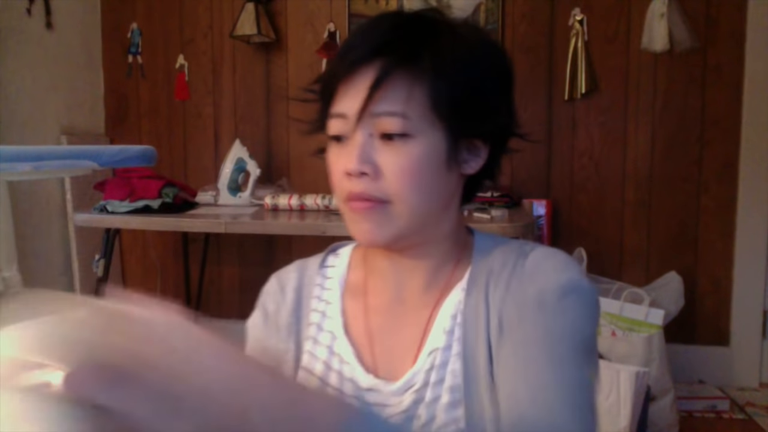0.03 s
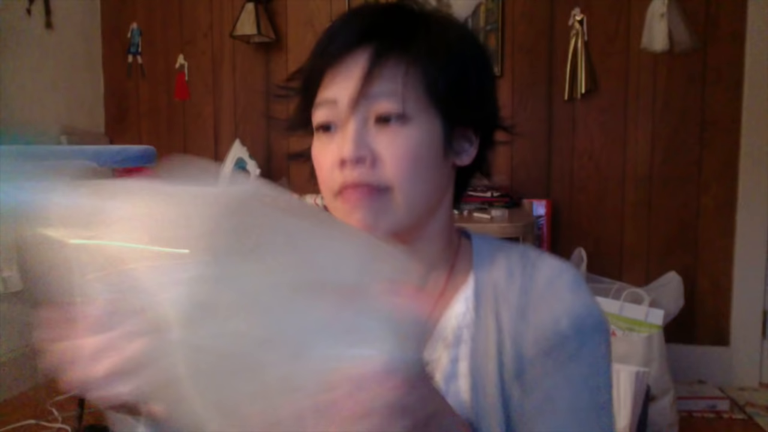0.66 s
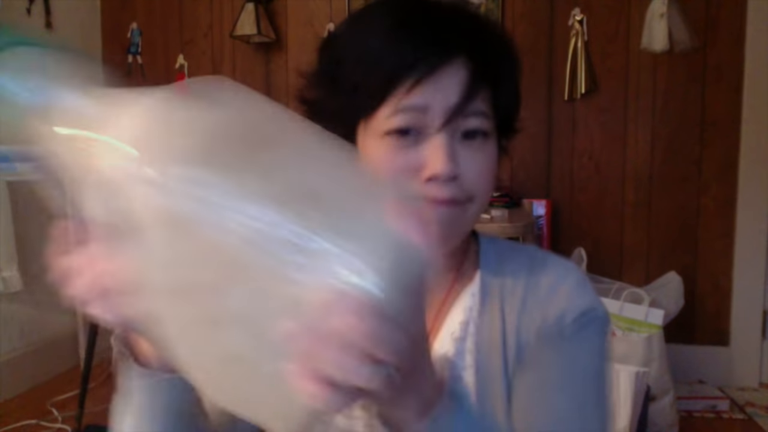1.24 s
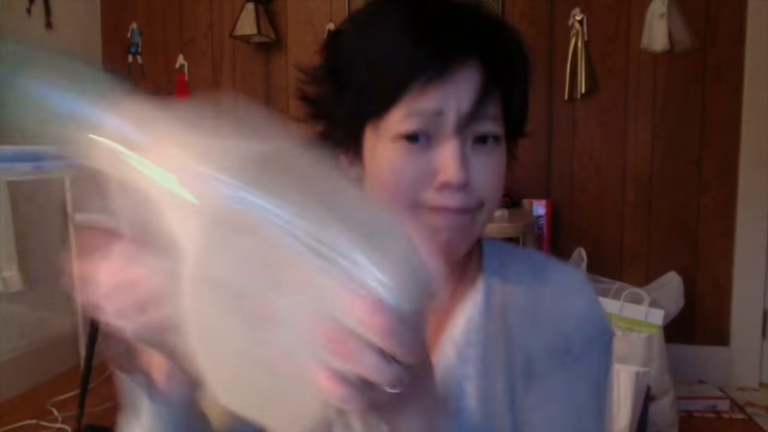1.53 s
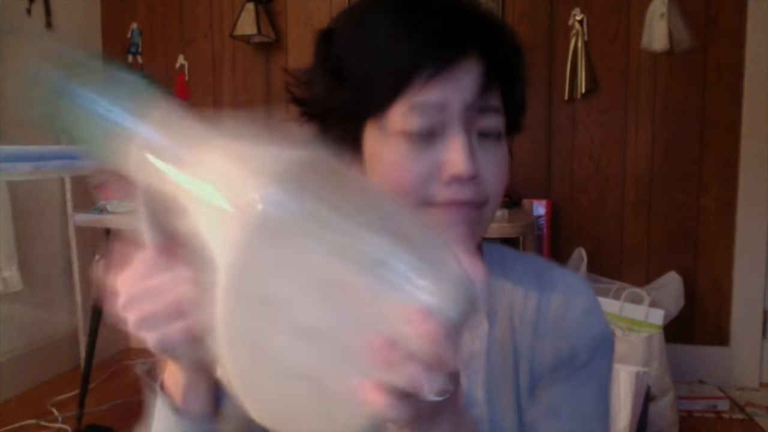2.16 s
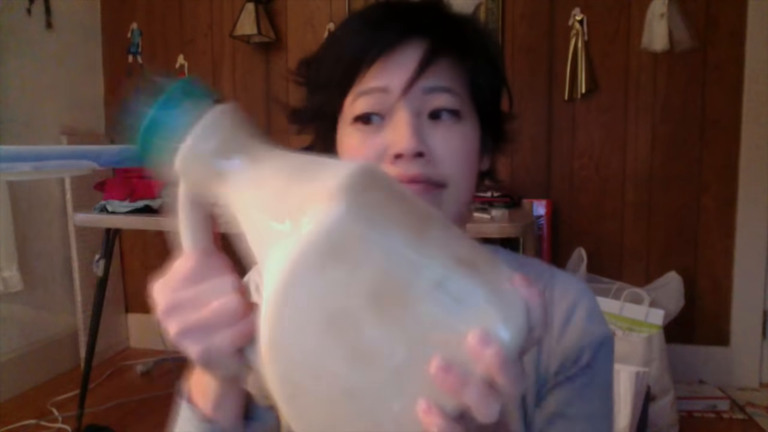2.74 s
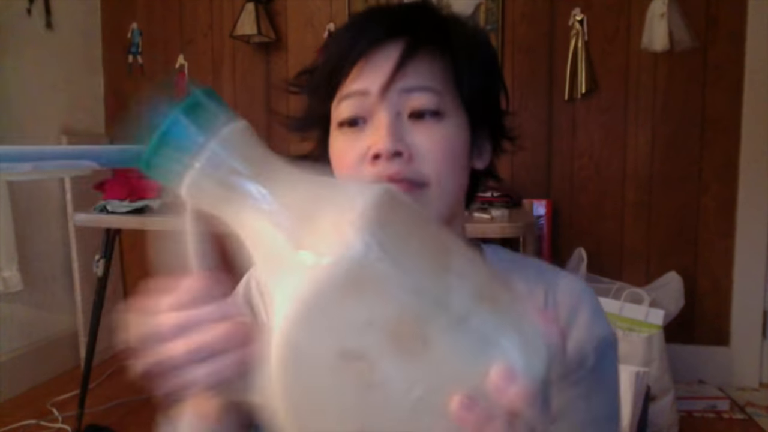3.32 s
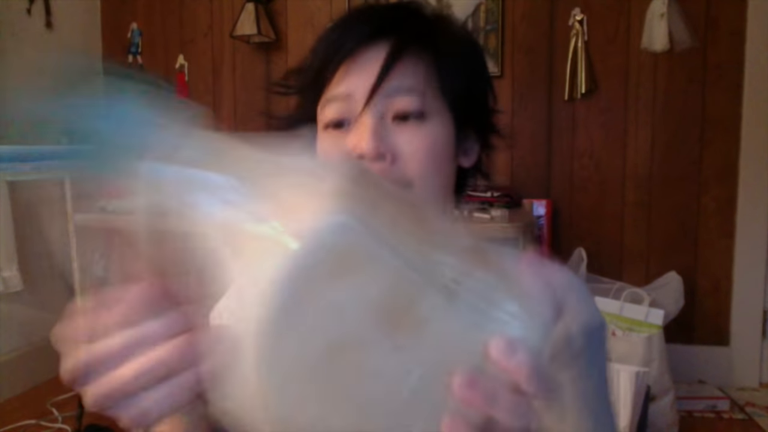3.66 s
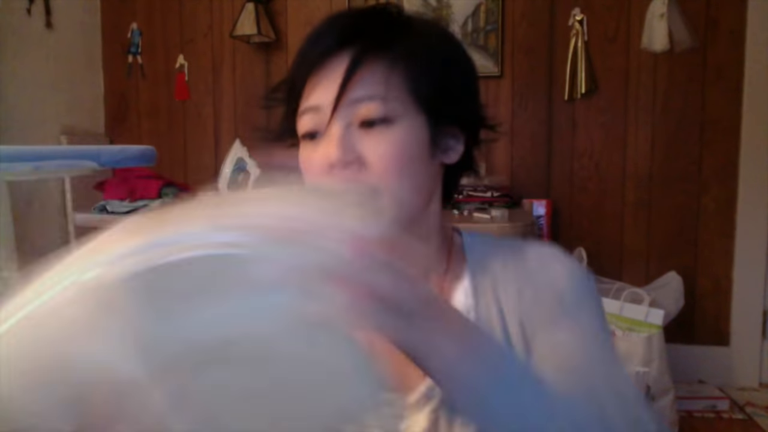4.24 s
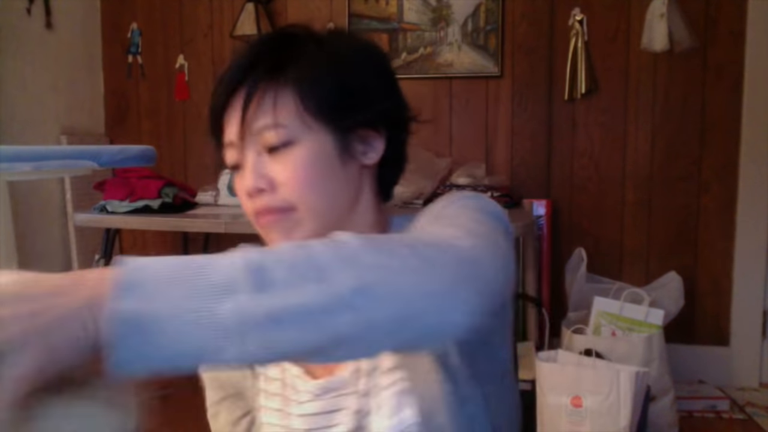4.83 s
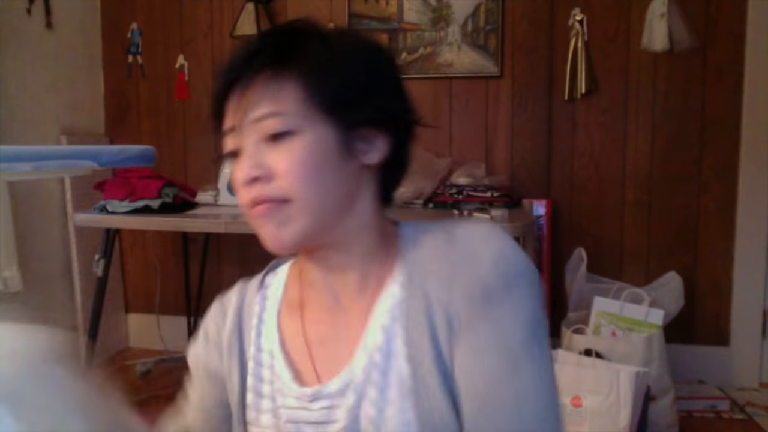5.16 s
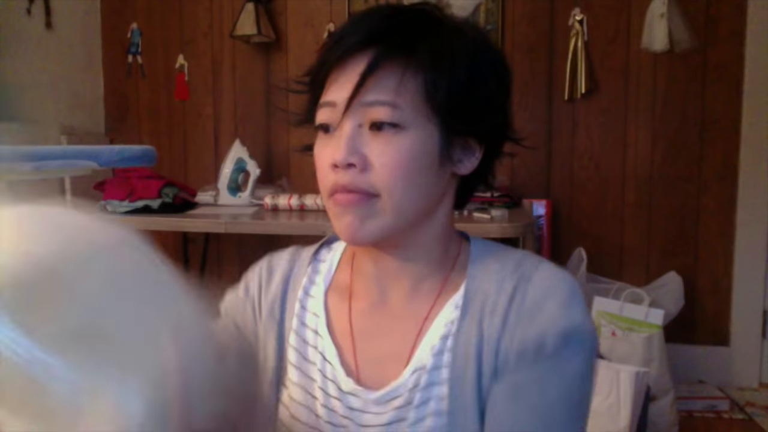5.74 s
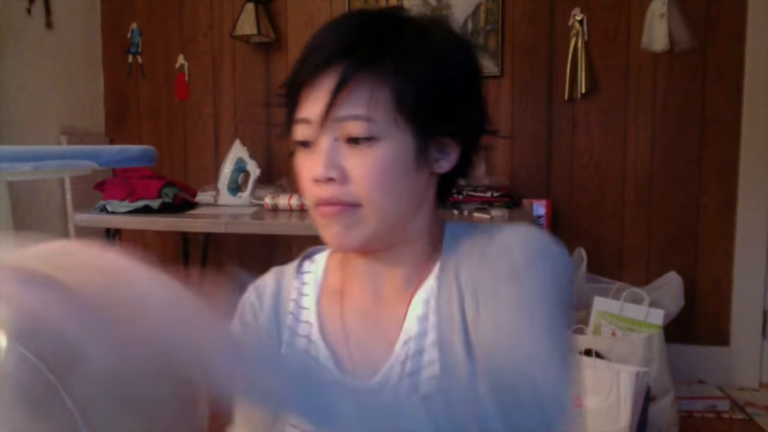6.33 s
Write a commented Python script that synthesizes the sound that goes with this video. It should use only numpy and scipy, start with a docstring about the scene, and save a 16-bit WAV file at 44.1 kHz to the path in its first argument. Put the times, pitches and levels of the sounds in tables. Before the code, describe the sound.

In a small room, liquid sloshes rapidly back and forth inside a big plastic jug right by the microphone. Each stroke thumps hollowly and breaks into bubbly splashes, with occasional glugs and dull slaps against the plastic. After building for about four seconds, the shaking eases off and the liquid trickles and settles. A single brief shake and a few small sloshes finish it.

```python
"""Water and powder are shaken hard in a big plastic jug, close to the microphone in a small room.
Seven strokes a second boom in the jug and break into gurgle, splash and spray, while bubbles pop,
slugs of water slap the plastic and air pockets glug. The shaking is hardest between 3 and 4 s.
Then the jug is lowered and the foam settles; one short shake follows at 5.8 s."""
import sys
import numpy as np
from scipy import signal
from scipy.io import wavfile
from scipy.ndimage import uniform_filter1d

SR = 44100
rng = np.random.default_rng(int(sys.argv[2]) if len(sys.argv) > 2 else 0)


def unload_audio(sound):
    """Save the sound as a 16-bit wav file, at the path given as the first command line argument."""
    columns = np.transpose(np.atleast_2d(sound))
    # keep every value between -1 and 1, then stretch to whole-number steps
    steps = np.round(np.clip(columns, -1, 1) * 32767)
    wavfile.write(sys.argv[1], SR, steps.astype(np.int16))


N = 281737
TIME = np.arange(N) / SR

# Strokes: the water hits one end of the jug, then folds back on itself as a second wave.
# t/s, swell/s, decay/s, boom/dB, gurgle/dB, splash/dB, spray/dB, fold delay/s, fold against hit/dB
STROKES = [(0, 0.00073, 0.017, -33, -44, -46, -47, 0.13, -5.5),
           (0.148, 0.057, 0.022, -35, -36.5, -32, -33, 0.031, -18),
           (0.304, 0.034, 0.032, -28, -29, -27.5, -37, 0.063, -15),
           (0.421, 0.042, 0.038, -32.0, -32.5, -31.5, -43, 0.071, 5),
           (0.58, 0.035, 0.031, -26.5, -28, -28.5, -38.5, 0.059, -3),
           (0.703, 0.046, 0.032, -26.5, -25, -23.5, -31.5, 0.077, -6.5),
           (0.872, 0.0026, 0.082, -25.5, -30, -25.5, -37, 0.14, -12),
           (0.978, 0.063, 0.025, -28, -28.5, -26.5, -34.5, 0.078, -0.5),
           (1.127, 0.037, 0.032, -23, -29.5, -27, -40, 0.075, -2.5),
           (1.275, 0.018, 0.047, -31.5, -31, -30.5, -38, 0.047, 5),
           (1.443, 0.012, 0.023, -22.5, -27.5, -27, -43, 0.056, -3.5),
           (1.569, 0.024, 0.035, -26, -28.5, -26.5, -34.5, 0.037, -0.5),
           (1.727, 0.0098, 0.035, -23.5, -27, -26.0, -51, 0.064, -1),
           (1.854, 0.033, 0.035, -23.5, -28.5, -27.5, -35.5, 0.041, 2),
           (2.001, 0.035, 0.029, -25, -25.5, -27, -38, 0.064, 1),
           (2.124, 0.055, 0.023, -23.5, -26, -26, -36, 0.082, -0.5),
           (2.281, 0.051, 0.021, -23.5, -25.5, -24.5, -42, 0.083, -2),
           (2.433, 0.035, 0.023, -22, -28.0, -27.5, -37.5, 0.058, 1.5),
           (2.594, 0.0087, 0.038, -25.5, -26.5, -26, -37.5, 0.035, -1.5),
           (2.73, 0.012, 0.032, -28, -26.5, -28, -38, 0.042, 2),
           (2.881, 0.0057, 0.034, -20.5, -25.5, -21.5, -34.5, 0.031, -6),
           (3.004, 0.03, 0.041, -30, -28, -26.5, -37, 0.049, -2),
           (3.148, 0.024, 0.034, -18.5, -24.5, -22.5, -38, 0.047, -1),
           (3.273, 0.037, 0.025, -25.5, -23, -27.5, -36, 0.06, 3.5),
           (3.438, 0.0039, 0.031, -21, -24, -22, -31, 0.057, -6.5),
           (3.583, 0.007, 0.042, -25.5, -31, -27, -38, 0.038, 5),
           (3.72, 0.013, 0.04, -17, -24, -18, -27, 0.054, -9.5),
           (3.864, 0.025, 0.033, -24.5, -23.5, -22, -31, 0.06, -5),
           (3.966, 0.067, 0.014, -36.5, -33.5, -30.5, -41, 0.037, 8),
           (4.083, 0.0066, 0.006, -27.5, -34, -25, -47, 0.056, -12),
           (4.147, 0.018, 0.018, -27, -26, -32, -49, 0.08, -25),
           (4.269, 0.015, 0.028, -35, -31, -37, -36.5, 0.053, -1),
           (4.356, 0.024, 0.029, -32.5, -36.0, -33, -32.5, 0.023, 3),
           (4.491, 0.005, 0.033, -22, -23, -24.5, -35.5, 0.086, -6.5),
           (4.603, 0.012, 0.019, -30.5, -43, -22.5, -21, 0.054, -18),
           (4.664, 0.051, 0.071, -37, -35.5, -31.5, -38, 0.14, -3.5),
           (4.8, 0.031, 0.035, -35.5, -31.5, -34, -39, 0.11, -11),
           (4.904, 0.031, 0.05, -34, -39, -36, -48, 0.036, -1),
           (5.064, 0.014, 0.022, -42.0, -42.5, -33.5, -43.5, 0.055, -1.5),
           (5.288, 0.0052, 0.011, -43.5, -50, -28.5, -45, 0.073, -14),
           (5.441, 0.0063, 0.06, -52, -50, -44.5, -64, 0.065, -9),
           (5.815, 0.019, 0.08, -29.5, -34, -35, -44.5, 0.051, 1),
           (6.025, 0.0028, 0.018, -46, -33.5, -37, -69, 0.038, -18),
           (6.172, 0.012, 0.018, -43.5, -38.5, -61, -82, 0.062, 1.5),
           (6.277, 0.026, 0.033, -46.5, -54, -39, -39.5, 0.063, 2.5),
           (6.344, 0.017, 0.01, -32.5, -26, -28, -40.5, 0.011, -13)]


def slosh():
    """Strokes boom in the jug and tear the water into bubbles; returns boom, foam, splash envelope."""
    # Colours of large, middling and tiny bubbles, and of mist and powder on the plastic: f/Hz, level/dB
    gurgle_eq = [(300, -8), (450, -7.5), (515, 0), (630, 2), (850, -3), (1150, -5), (1500, -24)]
    splash_eq = [(900, -10.5), (1250, -2.5), (1600, 2), (2200, -1.5), (3000, -2.5), (4300, -6), (5400, -23)]
    spray_eq = [(3600, -24.5), (4600, 3), (5100, 2.5), (6000, -1.5), (7700, -10), (10000, -21.5),
                (12500, -30.5), (15500, -58)]
    mist_eq = [(2000, -15), (5000, -9), (8000, 8.5), (11000, -7.5), (13000, -15.5), (15500, -21)]
    boom_db, gurgle_db, splash_db, spray_db = np.transpose(STROKES)[3:7]
    boom = steadied(jug(rng.standard_normal(N)), span_s=0.0335, amount=0.96)
    boom *= flow(boom_db, swell_scale=1.16, decay_scale=1.4, fold_db=-3, trickle_db=-33)
    gurgle = froth(gurgle_eq, 396.4, 1406, per_s=900, spread_db=5.5, cycles=2.08, even=1, clump_db=3)
    gurgle *= flow(gurgle_db, swell_scale=0.98, decay_scale=0.93, fold_db=-3, trickle_db=-17.5)
    splash = froth(splash_eq, 967, 5050, per_s=4000, spread_db=3.5, cycles=2.9, even=1, clump_db=1)
    splash_env = flow(splash_db, swell_scale=1, decay_scale=1, fold_db=1, trickle_db=-13)
    spray = froth(spray_eq, 3980, 13600, per_s=3000, spread_db=5, cycles=15.3, even=0.39, clump_db=1)
    spray_env = flow(spray_db, swell_scale=1.22, decay_scale=0.68, fold_db=3.6, trickle_db=-20.5)
    mist = froth(mist_eq, 5000, 15000, per_s=3000, spread_db=5, cycles=12, even=.4, clump_db=2, bands=80)
    mist *= amp(-35) * np.tanh((spray_env / amp(-29.5)) ** 2.8)  # only the hardest sloshing makes mist
    foam = amp(1) * gurgle + amp(0.3) * splash * splash_env + amp(-0.5) * (spray * spray_env + mist)
    return amp(0.5) * boom, foam, splash_env


def flow(levels_db, swell_scale, decay_scale, fold_db, trickle_db):
    """Envelope of one layer: the hit and fold-back of every stroke, riding on the trickle."""
    # Liquid draining down the walls between strokes: t/s, level/dB
    trickle = [(0, -24), (.1, -54.5), (.25, -28), (1, -32), (2, -34.5), (4, -32), (5, -29.5), (5.2, -37),
               (5.65, -46), (6.15, -48), (6.39, -41)]
    power = amp(np.interp(TIME, *np.transpose(trickle)) + trickle_db) ** 2
    for (start, swell_s, decay_s, *_, delay_s, second_db), db in zip(STROKES, levels_db):
        hit = amp(db) * wave(swell_s * swell_scale, decay_s * decay_scale)
        fold = amp(db + second_db + fold_db) * wave(swell_s=0.0075, decay_s=decay_s * decay_scale)
        add(power, start, hit ** 2)
        add(power, start + delay_s, fold ** 2)
    return np.sqrt(power)


def wave(swell_s, decay_s):
    """Envelope of one wave: it swells, breaks and drains away."""
    t, swell_s = TIME[:SR // 2], max(swell_s, .001)
    return np.minimum(t / swell_s, 1) ** 1.37 * np.exp(-np.maximum(t - swell_s, 0) / decay_s)


def jug(drive):
    """The walls and the air inside ring at their resonances: a hollow boom."""
    # Resonances of the jug: f/Hz, width/Hz, level/dB
    modes = [(103.5, 59, -16), (150, 55, -10), (161, 17, -6.5), (214.8, 16.2, -1.5), (245.6, 9.2, -0.5),
             (272.4, 32.6, -6.5), (325.8, 45.2, -2.5), (390.3, 51, -8.5)]
    # Colour of the boom: f/Hz, level/dB
    boom_eq = [(30, -57), (60, -5), (95, 0), (390, -5), (460, 10), (700, -41.5), (2000, -75)]
    t = TIME[:SR // 4]
    ring = sum((-1) ** k * amp(db) * width * np.exp(-np.pi * width * t) * np.cos(2 * np.pi * hz * t)
               for k, (hz, width, db) in enumerate(modes))
    return colour(signal.oaconvolve(drive, ring * 2 * np.pi / SR)[:N], boom_eq)


def froth(eq, low_hz, high_hz, per_s, spread_db, cycles, even, clump_db, bands=160):
    """A swarm of short bubbles that surges in clumps; a few stand well above the rest."""
    out = np.zeros(N + SR)
    drift = uniform_filter1d(uniform_filter1d(rng.standard_normal(N), 200), 150)
    clumps = amp(clump_db * unit(drift))
    for hz in np.geomspace(low_hz, high_hz, bands):
        when, rarity, polarity = rng.random((int(per_s * N / SR / bands), 3)).T
        births = (when * N).astype(int)
        height = np.sign(polarity - .5) * amp(spread_db * np.minimum(-np.log(rarity), 4)) * clumps[births]
        ring = damped_ring(hz, cycles * 2 ** rng.uniform(-1.08, 1), glide=0.13, onset=0.49)
        ring *= np.sqrt(hz / np.sum(ring ** 2))
        samples = births[:, None] + np.arange(len(ring))
        out += np.bincount(samples.ravel(), np.outer(height, ring).ravel(), len(out))
    return steadied(colour(out[:N], eq), span_s=0.023, amount=even)


def pops(splash_env):
    """Loud single bubbles, and lesser ones at random whose strength follows the splash."""
    # The loudest bubbles: t/s, level/dB, f/Hz, ring time/s
    loud_pops = [(.236, -22.5, 1700, 0.002), (.2868, -16, 2220, .0012), (.3597, -14.5, 2190, .0008),
                 (.5932, -12, 1920, .0008), (.886, -9, 1930, 0.0016), (.899, -12, 2230, 0.0016),
                 (1.1606, -12, 1710, .0015), (1.447, -8, 1990, 0.00081), (1.4608, -13.5, 2250, 0.0025),
                 (1.616, -11, 1480, 0.0026), (1.701, -18, 2260, 0.0013), (1.7371, -19, 2130, .0019),
                 (1.8105, -13.5, 2670, 0.0013), (2.0255, -6.5, 2360, 0.00078), (2.0369, -13, 2310, 0.0013),
                 (2.217, -11.5, 1650, 0.0015), (2.2904, -16, 2430, 0.0015), (2.3058, -11, 2350, .0025),
                 (2.6064, -13.5, 2110, .002), (2.618, -12, 2800, .0011), (2.8121, -10, 1560, .0025),
                 (2.874, -18, 2540, 0.0026), (3.1445, -11.5, 2170, 0.00071), (3.1709, -5.5, 1990, 0.0015),
                 (3.224, -10, 2300, .0007), (3.3344, -6, 1370, 0.0017), (3.3433, -10, 1430, .0028),
                 (3.4212, -17, 2500, .0012), (3.4572, -1.5, 2540, 0.00082), (3.4574, -11, 8500, 0.00083),
                 (3.4812, -6.5, 2250, .002), (3.6602, -9, 1840, .0015), (3.6946, -17.5, 2700, 0.0042),
                 (3.755, -4, 1700, .0008), (3.7904, -11, 2750, .0007), (3.9382, -14, 1540, 0.0014),
                 (4.0177, -10, 2210, 0.0016), (4.0325, -8, 2760, .0008), (4.1009, -9.5, 2370, 0.0022),
                 (4.2902, -17.5, 2330, .0015), (4.3254, -15.5, 2060, .0037), (4.326, -16, 950, 0.0038),
                 (4.3355, -13.5, 2290, 0.0021), (4.386, -10, 4040, 0.0012), (4.614, -5.5, 4800, .0019),
                 (4.62, -9.5, 2100, .0025), (4.7774, -5.5, 2240, 0.0014), (4.8565, -13.5, 4900, 0.0013),
                 (4.8674, -26.5, 4900, .0009), (4.8746, -17, 3400, 0.0015), (4.9218, -17.5, 3560, .0018),
                 (4.9463, -14, 1760, .0008), (4.9592, -17, 1820, 0.0016), (4.9842, -20, 735, .003),
                 (5.0056, -21, 2430, 0.0013), (5.0422, -28, 2150, 0.0026), (5.077, -24, 2340, 0.0009),
                 (5.109, -25.5, 5600, .0027), (5.2141, -34, 2370, .0021), (5.247, -28, 5200, .0007),
                 (5.3204, -29, 4030, .0013), (5.374, -24.5, 4330, .0016), (5.3777, -19, 2050, 0.00084),
                 (5.446, -31.5, 1510, 0.0022), (5.466, -25.5, 2380, 0.0015), (5.484, -29, 6350, 0.003),
                 (5.489, -27, 3580, .0012), (5.6447, -32.5, 1570, 0.0021), (5.8114, -12.5, 2500, 0.0015),
                 (5.8372, -11.5, 2100, .0008), (5.8841, -16, 1920, 0.0018), (6.029, -17.5, 2430, 0.0015),
                 (6.2536, -29.5, 1870, 0.003), (6.3053, -26, 3240, .0015)]
    # Lesser bubbles in two sizes: rate/(1/s), f/Hz, pitch spread/octaves, level above the splash/dB
    bubble_sizes = [(16, 2020, 0.25, 15.5), (16, 4720, 0.32, 3.5)]
    spread_db, typical_ring_s = 2.2, .0015
    out, bubbles = np.zeros(N), list(loud_pops)
    for per_s, hz, octaves, above_db in bubble_sizes:
        times = rng.random(int(per_s * N / SR)) * (N - 1) / SR
        scatter = np.clip(rng.standard_normal((len(times), 3)), -2, 2)
        for at, (strength, pitch, length) in zip(times, scatter):
            db = 20 * np.log10(splash_env[int(at * SR)]) + above_db + spread_db * strength
            bubbles.append((at, db, hz * 2 ** (octaves * pitch), typical_ring_s * 2 ** (length / 2)))
    for at, db, hz, ring_s in bubbles:
        crest_s = .8 * max(ring_s, .001)
        add(out, at - crest_s, pop(db, hz, crest_s))
    return colour(out, [(5000, -2.5), (7500, -8), (10000, -10), (15000, -54)])  # the plastic dulls them


def pop(db, hz, crest_s):
    """One bubble swells and dies within milliseconds, chirping up a little, with a faint wet tick."""
    t = TIME[:SR // 50]
    swell = (t / crest_s * np.exp(1 - t / crest_s)) ** 2
    ring = np.sin(2 * np.pi * hz * (t - crest_s) * (1 + 15 * (t - crest_s)))
    band = signal.butter(2, [hz * .6, min(hz * 2.2, hz + 3000)], "band", fs=SR)
    tick = unit(signal.lfilter(*band, rng.standard_normal(len(t))))
    return amp(db) * swell * (ring + amp(-15) * tick)


def slaps():
    """A slug of water hits the wall, or the jug is bumped: a short, dead thump with little below its own pitch."""
    # Hard slaps on the plastic; the row at 5.562 s is the jug bumped as it is set down: t/s, level/dB, f/Hz
    hits = [(0.614, -13, 148), (0.741, -5.5, 367), (.875, -11.5, 125), (1.018, -2, 550), (1.036, -5, 273),
            (2.884, 1.5, 600), (3.04, -6.5, 275), (3.169, -6, 213), (3.44, -1, 403), (3.593, -5.5, 590),
            (3.755, -14, 272), (4.161, -7, 487), (4.493, 3, 365), (5.562, -16, 293), (5.833, -23, 123),
            (6.18, -17, 1000)]
    out = np.zeros(N)
    for at, db, hz in hits:
        thump = damped_ring(hz, cycles=1.12, glide=0.0061, onset=0.68)
        low_cut = signal.butter(2, hz * .4, "high", fs=SR)
        add(out, at - .001, amp(db - 7.5) * signal.lfilter(*low_cut, thump))
    return out


def glugs():
    """A pocket of air rings while the water squeezes it, so its pitch slides and its level wobbles."""
    # Trapped air pockets: t/s, length/s, level/dB, first f/Hz, last f/Hz
    pockets = [(1.169, 0.074, -29.5, 292, 241), (1.489, 0.1, -25, 226, 289), (2.072, 0.082, -26, 283, 244),
               (2.37, 0.071, -21.5, 267, 232), (2.653, 0.065, -22, 312, 311), (2.918, 0.028, -19, 341, 265),
               (3.195, 0.097, -17, 219.4, 315), (3.479, 0.078, -13, 324.6, 253),
               (3.754, 0.064, -14.5, 244.5, 324), (5.922, 0.083, -23.5, 287, 259)]
    out = np.zeros(N)
    slow_noise = colour(rng.standard_normal(N), [(60, 7), (200, -93), (600, -127)])
    wobble = steadied(slow_noise, span_s=0.098, amount=0.97)
    for start, length_s, db, first_hz, last_hz in pockets:
        progress = np.linspace(0, 1, int(length_s * SR))
        squeeze = wobble[int(start * SR):][:len(progress)]
        hz = (first_hz + (last_hz - first_hz) * progress) * (1 + .025 * squeeze)
        envelope = np.minimum(progress / .08, 1) * np.cos(progress * np.pi / 2) * amp(1.2 * squeeze)
        add(out, start, amp(db - .5) * envelope * np.sin(2 * np.pi * np.cumsum(hz) / SR))
    return out


def walls(drive, t60_s, low_hz, high_hz, count, block=4096):
    """Bubbles set the thin plastic ringing; the moving water keeps retuning its modes at random."""
    out, t = np.zeros(N), TIME[:block // 2]
    window = signal.windows.hann(block, sym=False)
    span = np.log(high_hz / low_hz)
    for start in range(0, N - block, block // 2):
        detune, phase = rng.random((2, count, 1))
        hz = low_hz * np.exp(span * (np.arange(count)[:, None] + detune) / count)
        modes = amp(-60 * t / t60_s) * np.sin(2 * np.pi * (hz * t + phase))
        share = 2 * hz * span / count / SR  # each mode gathers the energy of its part of the spectrum
        ring = (modes * np.sqrt(share) / np.linalg.norm(modes, axis=1, keepdims=True)).sum(0)
        add(out, start / SR, signal.fftconvolve(drive[start:start + block] * window, ring))
    return out


def room(sound, size=20480):
    """Sparse echoes from panelled walls; the treble around 4 kHz dies first."""
    # Decay of the room: f/Hz, T60/s
    decay_times = [(100, 0.36), (300, 0.21), (1000, 0.34), (4000, 0.13), (12000, 0.31)]
    echoes = rng.choice([-1., 1.], size) * (rng.random(size) < 3000 / SR)
    echoes *= TIME[:size] > .004  # pre-delay
    hz, t, spectrum = signal.stft(echoes, SR, nperseg=256)
    fade = amp(-60 * t / curve_at(decay_times, hz)[:, None])
    tail = signal.istft(spectrum * fade, SR, nperseg=256)[1]
    return signal.oaconvolve(sound, tail / np.linalg.norm(tail))[:N]


def room_tone():
    """The faint, dark hush of the room."""
    # Colour of the hush: f/Hz, level/dB
    hush_eq = [(25, -8), (60, 3), (110, 22.5), (220, 15), (400, 16.5), (1500, 2), (4000, -18), (9000, -14),
               (15000, -37)]
    return unit(colour(rng.standard_normal(N), hush_eq))


def damped_ring(hz, cycles, glide, onset):
    """A ring that swells over `onset` cycles, decays over `cycles` and rises in pitch as it dies."""
    turns = np.arange(int(7 * cycles * SR / hz) + 8) * hz / SR
    envelope = (1 - np.exp(-(turns / onset) ** 2)) * np.exp(-turns / cycles)
    return envelope / envelope.max() * np.sin(2 * np.pi * turns * (1 + glide * turns / turns[-1]))


def steadied(x, span_s, amount):
    """Evens out the slow swings of a texture and keeps its fine grain."""
    power = abs(uniform_filter1d(x ** 2, int(span_s * SR))) + 1e-12
    return unit(x / power ** (amount / 2))


def colour(x, eq, size=4096):
    """Minimum-phase EQ through points of f/Hz, level/dB."""
    log_gain = np.log(amp(curve_at(eq, abs(np.fft.fftfreq(size, 1 / SR)))))
    taps = np.fft.ifft(np.exp(np.conj(signal.hilbert(log_gain)))).real
    return signal.oaconvolve(x, taps[:size // 2])[:N]


def curve_at(points, hz):
    """Reads a curve on a log-frequency axis."""
    f, value = np.transpose(points)
    return np.interp(np.log(hz + 1), np.log(f + 1), value)


def add(mix, start_s, sound):
    """Lays a sound into the mix."""
    part = mix[max(round(start_s * SR), 0):][:len(sound)]
    part += sound[:len(part)]


def amp(db):
    """Decibels to gain."""
    return 10 ** (np.asarray(db) / 20)


def unit(x):
    """Scales to rms 1."""
    return x / np.sqrt(np.mean(x ** 2) + 1e-20)


def scene():
    """The jug close by, its echo, and the hush of the room."""
    hush = amp(-56) * room_tone()
    boom, foam, splash_env = slosh()
    popping = pops(splash_env)
    ringing = walls(amp(-7) * foam + amp(-9) * popping, t60_s=.038, low_hz=500, high_hz=14000, count=90)
    near = boom + amp(-1.3) * foam + amp(-2) * popping + ringing + slaps() + glugs()
    return (near + amp(-12.5) * room(near) + hush)[None]


def record(dry):
    """A small microphone loses the deep bass and rounds off the hardest peaks; a high cut follows."""
    # Colour at the microphone, where near reflections lift some bass notes, cancel others: f/Hz, level/dB
    mic_eq = [(40, 4), (90, 0.5), (125, -3), (175, 2), (220, 0.5), (280, 2.2), (395, -1), (460, -6.5),
              (520, 1.9), (700, -0.1), (2000, 0.65), (6000, 0.2), (11000, 3.5), (15000, 9)]
    ceiling = .8
    low_cut = signal.butter(4, 62, "high", fs=SR, output="sos")
    high_cut = signal.firwin(511, 15750, window=("kaiser", 9), fs=SR)
    thin = signal.sosfilt(low_cut, colour(dry[0], mic_eq))
    rounded = thin / (1 + (thin / ceiling) ** 4) ** .25
    return signal.oaconvolve(rounded, high_cut, "same")[None]


dry = scene()
out = record(dry)
unload_audio(out)
```